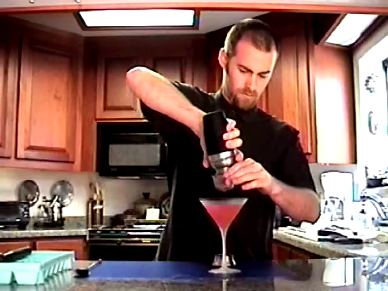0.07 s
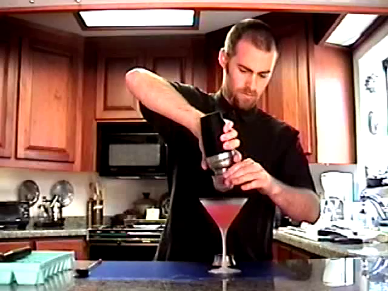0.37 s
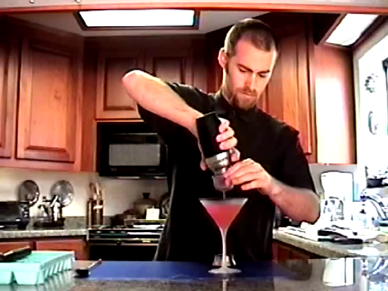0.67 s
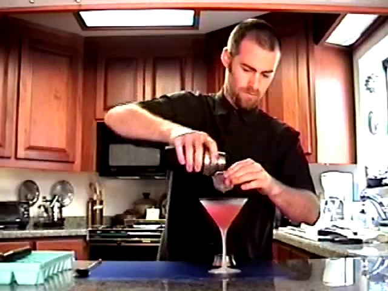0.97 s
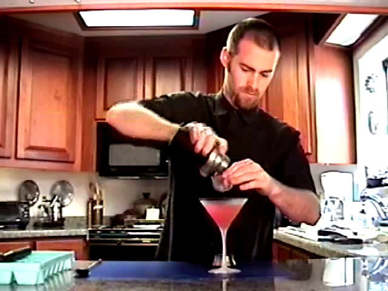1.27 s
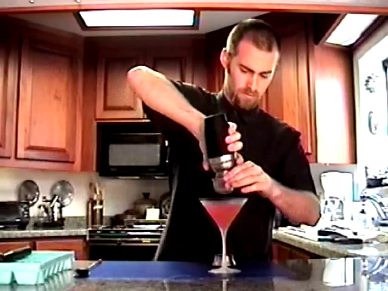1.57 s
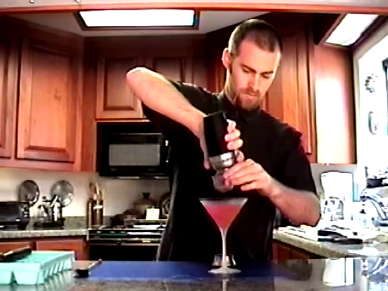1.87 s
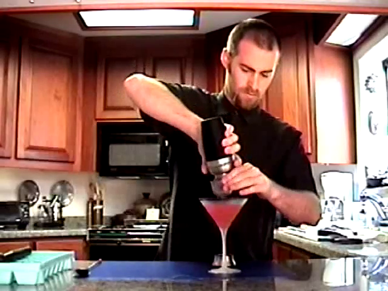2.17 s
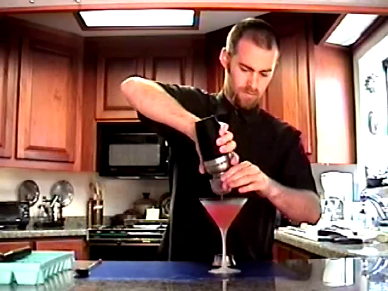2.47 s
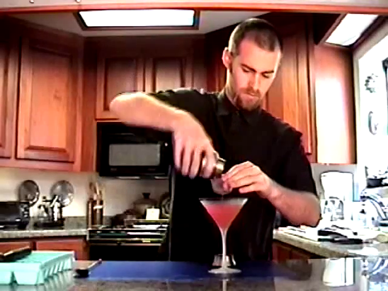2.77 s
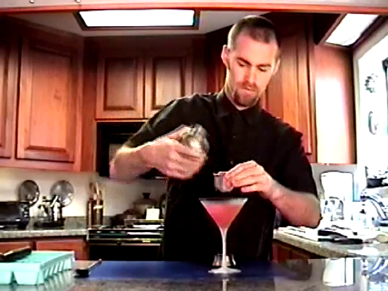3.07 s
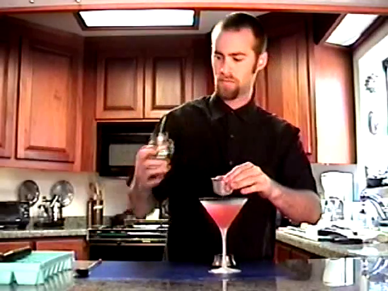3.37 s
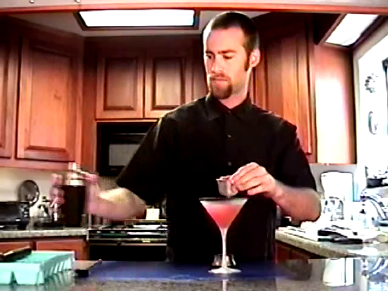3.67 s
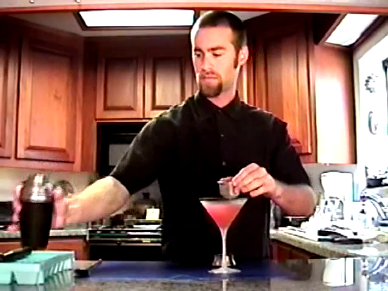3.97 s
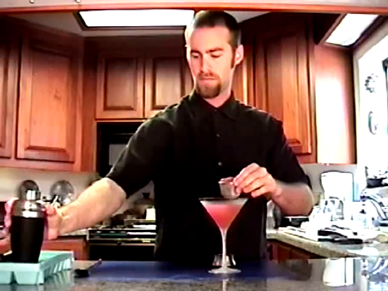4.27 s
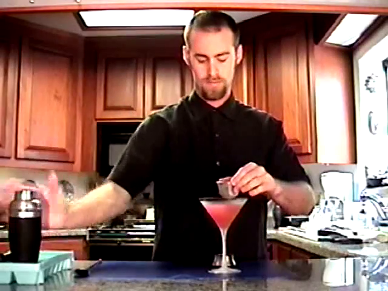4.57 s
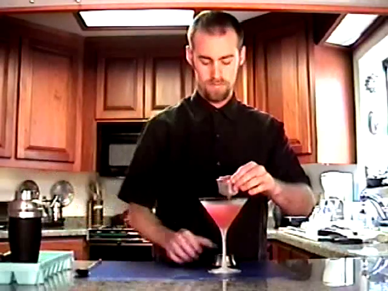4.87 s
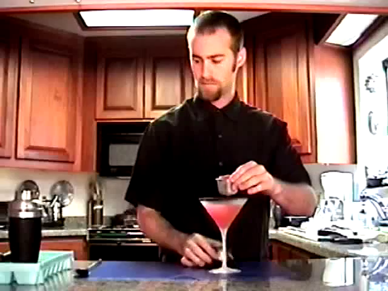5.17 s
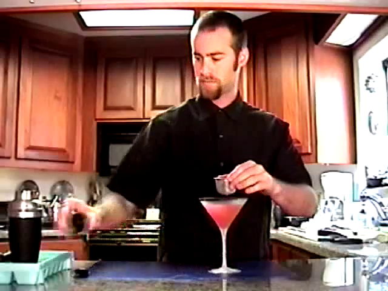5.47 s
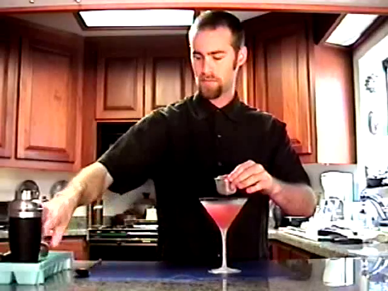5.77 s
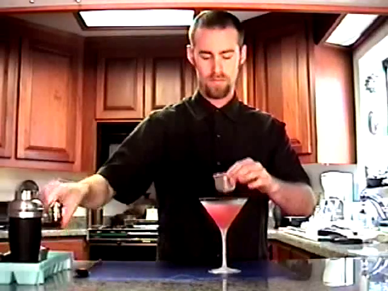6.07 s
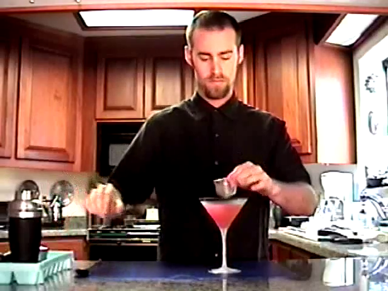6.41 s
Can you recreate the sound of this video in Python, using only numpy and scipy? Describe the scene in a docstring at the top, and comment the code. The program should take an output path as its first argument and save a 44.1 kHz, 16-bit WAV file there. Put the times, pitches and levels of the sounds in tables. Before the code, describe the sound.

In an echoing kitchen, a steel cocktail shaker is tipped twice to drain a drink. Each time, ice slides, knocks against the wall and piles into the strainer, while the cap clinks on a steel measuring cup. The shaker is then set down on the counter with a loud clack. After a few faint ticks, a utensil drops and bounces. A soft rumble and hiss continue underneath.

```python
"""A soft rumble and hiss fill an echoing kitchen. A steel cocktail shaker is tipped twice to get the
last of a drink out: ice slides, knocks on the wall and piles into the strainer, the cap clinks on a
steel jigger (a measuring cup) held under it, and the air over the sloshing drink hums. Then the shaker
is set down hard and rocks, and after a few faint ticks of handling a utensil drops beside it.
A limiter flattens the loudest blows."""
import sys
import numpy as np
from scipy import signal
from scipy.fft import rfft, irfft
from scipy.io import wavfile
from scipy.ndimage import uniform_filter1d

SR = 44100
rng = np.random.default_rng(int(sys.argv[2]) if len(sys.argv) > 2 else 0)


def store_wav(level_fs):
    """Save 16-bit WAV to argv[1]."""
    pcm = np.round(np.clip(np.atleast_2d(level_fs), -1, 1) * 32767)
    wavfile.write(sys.argv[1], SR, pcm.T.astype(np.int16))


N = 284004
TIME = np.arange(N) / SR

# Levels in the tables are relative; the functions set how loud each sound ends up.
# the room's low rumble and thin hiss: f/Hz, level/dB
RUMBLE_SPECTRUM = [(12, -76), (20, -10), (80, -20), (107, -12), (133, -17), (157, -5.5), (217, -7.5),
                   (317, -3), (341, -7), (439, -6.5), (472, -3), (498, -9), (888, -10), (1500, -20),
                   (1950, -34), (3300, -120)]
HISS_SPECTRUM = [(880, -55), (1500, -8), (1740, -6), (1970, 1), (2140, -4), (2560, -6), (3770, -13),
                 (5240, -11), (6030, -14.5), (6880, -11.5), (7560, -16.5), (9930, -13.5), (14200, -19.5)]
# how long the kitchen's echo takes to fade by 60 dB (its "t60"): f/Hz, t60/s
ECHO_FADE = [(100, 0.41), (500, 0.68), (1300, 0.61), (2600, 0.56), (5000, 0.6), (9000, 0.44), (14000, 0.44)]
# loose ice sliding: t/s, length/s, level/dB, extra for fine chips/dB, extra for heavy cubes/dB
ICE_SLIDES = [(1.035, 0.22, -37.5, -13, 1.5), (1.362, 0.074, -30.5, -4.5, -8),
              (1.55, 0.15, -30.5, -9.5, -2), (2.906, 0.095, -37, -17, 1.5), (2.999, 0.083, -28.5, -3, -6.5),
              (3.245, 0.099, -32.5, -2.5, -12), (3.462, 0.11, -27.5, -9.5, -2.5)]
# the crack of ice on steel: f/Hz, level/dB
ICE_SPECTRUM = [(290, -24.5), (500, -13), (792, -11.5), (1330, -3), (1610, -12.5), (2250, -6.5), (2940, -9),
                (4220, -5.5), (5060, -10.5), (5740, -8.5), (6970, -13.5), (8020, -12.5), (14000, -23.5)]
# ringing notes ("modes") of the shaker's wall, damped by the hand: f/Hz, width/Hz, level/dB
WALL_NOTES = [(1350, 92, -8.5), (2325, 160, -3), (2530, 130, -4), (4380, 280, -17), (5720, 110, -12)]
# single cubes hitting the wall: t/s, level/dB, extra for the clack/dB
CUBE_HITS = [(1.0385, -25.5, 9), (1.072, -22.5, 6), (1.180, -15.5, -4.5), (1.2148, -23, -15),
             (1.4266, -16, -1), (1.4724, -14, -1), (1.535, -15, -0.5), (1.5979, -14.5, 2.5),
             (1.6114, -14, -1), (1.659, -13.5, 7), (1.7476, -22, 7.5), (2.803, -43, 11),
             (2.9001, -29.5, 8.5), (2.9958, -23, -1), (3.012, -17.5, -1.5), (3.199, -18, 3.5),
             (3.460, -23, 7), (3.481, -16, 2), (3.489, -13, -2), (3.5025, -16.5, -11), (3.5459, -15, -5),
             (3.557, -12.5, -7), (3.6098, -15.5, 4.5), (3.6399, -13, 1), (3.995, -25, 2.5),
             (4.023, -34.5, 10.5), (4.07, -29.5, 10.5), (4.184, -36.5, 7)]
# the dull thud of a blow: f/Hz, level/dB
THUD_SPECTRUM = [(25, 19), (45, 18), (80, 12.5), (150, 5.5), (500, 11), (1000, 14.5), (1800, -18),
                 (4000, -49)]
# the load of ice crashing into the strainer: t/s, level/dB, extra for the thud/dB
STRAINER_CRASHES = [(1.135, -25, -13), (1.357, -24.5, -7), (1.375, -24.5, -6.5), (3.02, -24, -17),
                    (3.028, -21.5, -8), (3.044, -26.5, -28), (3.092, -23, -26)]
# the strainer plate's notes: f/Hz, width/Hz, level/dB
STRAINER_NOTES = [(3870, 160, -3), (4240, 490, 7), (5440, 150, -20)]
# cap on jigger; the spot hit decides which notes ring: t/s, level/dB, middle extra/dB, top extra/dB
CAP_HITS = [(1.2238, -26, 5.5, -4.5), (1.3051, -27, -1, 3.5), (1.332, -25, -9, -13), (1.406, -25, 1, -11),
            (1.509, -40, 8.5, 15), (3.099, -25.5, -3.5, -14), (3.2365, -32, 4.5, -3), (3.253, -32.5, 2, -4),
            (3.28, -24, -8, -2.5), (3.307, -21.5, -7.5, -9), (3.401, -30.5, -0.5, -1.5)]
# the jigger's notes: f/Hz, level/dB, t60/s
JIGGER_NOTES = [(2530, -8, 0.12), (2634, 7.5, 0.081), (2646, -12, 0.06), (4818, 0, 0.083),
                (8240, 0.5, 0.062), (10970, -9.5, 0.07), (12200, -14.5, 0.045)]
# air ringing over the last of the drink: t/s, length/s, first f/Hz, last f/Hz, level/dB
AIR_NOTES = [(1.331, 0.583, 313.4, 269.8, -51), (3.359, 0.349, 389.7, 459.7, -49.5)]
# tiny ticks of handling: t/s, level/dB
HANDLING_TICKS = [(2.693, -48), (2.952, -36), (5.074, -39.5), (5.0923, -58), (5.254, -38.5), (5.27, -46)]
# their bright tone: f/Hz, level/dB
TICK_SPECTRUM = [(1000, -32), (3000, -7), (7000, -8), (11000, -1), (14000, -10)]
# the shaker landing, then nudged as it is let go: t/s, level/dB, extra treble/dB
SHAKER_HITS = [(4.2435, -3, 5.5), (4.742, -32, -21), (4.747, -33, -10), (4.783, -37, -13),
               (4.833, -35, -12)]
# its clack on the counter: f/Hz, level/dB
SHAKER_SPECTRUM = [(59, -57), (100, -28), (182, -34), (219, -21), (254, -32), (281, -19), (568, -14.5),
                   (933, -13), (1200, -0.5), (2090, -2.5), (2650, -10), (3160, -16), (3730, -10.5),
                   (4050, -20.5), (10100, -32.5), (14000, -44)]
# notes of the shaker's base, free of the hand: f/Hz, width/Hz, level/dB
BASE_NOTES = [(210, 14, -2), (587, 12, -2), (1217, 12, 1), (1373, 12, -2), (1690, 12, -1), (2105, 14, -3),
              (2294, 14, -3)]
# the utensil dropping and bouncing: t/s, level/dB, extra treble/dB
UTENSIL_HITS = [(5.9935, -13.5, 5), (6.0738, -10, 3.5), (6.0909, -8, -3.5), (6.108, -17.5, -24),
                (6.131, -12, -7)]
# its clack on the counter: f/Hz, level/dB
UTENSIL_SPECTRUM = [(120, -66), (200, -38), (231, -29), (296, -32), (415, -15.5), (780, -17), (1120, -2),
                    (1690, 1), (2830, -12), (4030, -26.5), (5460, -25), (8510, -29), (9640, -26),
                    (14000, -46)]


def from_db(db):
    """Turn decibels into a number to multiply by."""
    return 10 ** (np.asarray(db) / 20)


def unit_power(x):
    """Scale a sound to an average power of one."""
    return x / np.sqrt(np.mean(x ** 2) + 1e-20)


def at_hz(table, hz):
    """Read between a table's rows, giving each octave equal room."""
    table = np.array(table)
    return np.interp(np.log(np.maximum(hz, 1)), np.log(table[:, 0]), table[:, 1])


def band(x, hz, kind, order=2):
    """Keep the lows, the highs or a band between."""
    return signal.sosfilt(signal.butter(order, hz, kind, fs=SR, output="sos"), x + 1e-18)


def colour(x, spectrum, size=8192):
    """Give a sound the tone of a spectrum table, using a filter of unit energy."""
    gains = from_db(at_hz(spectrum, np.fft.rfftfreq(size, 1 / SR)))
    cepstrum = irfft(np.log(gains))
    # fold it so that nothing sounds before the blow (minimum phase)
    cepstrum[1:size // 2] *= 2
    cepstrum[size // 2 + 1:] = 0
    response = irfft(np.exp(rfft(cepstrum)))
    return signal.fftconvolve(x, response / np.linalg.norm(response))[:N]


def resonances(x, notes):
    """An object rings at its own notes when it is shaken."""
    return sum(from_db(db) * signal.lfilter(*signal.iirpeak(hz, hz / width, fs=SR), x + 1e-18)
               for hz, width, db in notes)


def contacts(times, levels_db, t60, snap=0.31, size=3000):
    """Each touch is one snap and a quickly fading crunch of tiny impacts."""
    out = np.zeros(N + size)
    fade = from_db(-60 * TIME[:size] / t60)
    fade_size = np.linalg.norm(fade)
    for t, db in zip(times, levels_db):
        crunch = rng.standard_normal(size) * fade
        crunch[0] = snap * fade_size
        start = int(t * SR)
        out[start:start + size] += from_db(db) * crunch * fade_size / np.linalg.norm(crunch)
    return out[:N]


def bounces(blows, gap_s, loss_db, duller_db, rest_db, count, uneven=0.12):
    """After each blow a thing may touch again, weaker and changed in tone, until too weak to lift."""
    touches = []
    for (t, db, *tone_db), slips in zip(blows, rng.standard_normal((len(blows), count))):
        touches.append((t, db, *tone_db))
        for k in range(1, count):
            if db - k * loss_db > rest_db:
                when = t + gap_s * (k + uneven * slips[k])
                touches.append((when, db - k * loss_db, *np.subtract(tone_db, k * duller_db)))
    return np.transpose(touches)


def room_tone(rumble_db=-54, hiss_db=-63.5):
    """A steady low rumble and thin hiss."""
    rumble = from_db(rumble_db) * colour(rng.standard_normal(N), RUMBLE_SPECTRUM)
    hiss = from_db(hiss_db) * colour(rng.standard_normal(N), HISS_SPECTRUM)
    return rumble + hiss


def shaker_wall(force):
    """Ice on steel: a broad crack plus the short ring of the wall."""
    crack = colour(force, ICE_SPECTRUM)
    return crack + resonances(crack, WALL_NOTES)


def ice_grains(hits_per_s=700, spread_db=3.5, tinkle_db=-1, width_hz=190, pieces=24):
    """Random hits of uneven size; each cracks and rings briefly at the pitch of its own piece of ice."""
    sizes = from_db(spread_db * np.minimum(rng.exponential(1, N), 3))
    signs = rng.choice([-1, 1], N)
    clicks = sizes * signs * (rng.random(N) < hits_per_s / SR)
    pitches = np.geomspace(2000, 13000, pieces)
    piece = rng.integers(0, pieces, N)
    tinkle = sum(resonances(clicks * (piece == k), [(hz, width_hz * np.sqrt(hz / pitches[0]), 0)])
                 for k, hz in enumerate(pitches))
    return unit_power(shaker_wall(unit_power(clicks) + from_db(tinkle_db) * unit_power(tinkle)))


def ice_slide(slide_db=-6, chips_db=8, rise_db_per_s=400, settle_db_per_s=102, linger_db_per_s=30):
    """Each slide swells, holds and settles; chips make the highs, heavy cubes are the last to rest."""
    grains = ice_grains()
    low = band(grains, 1800, "low", order=3)
    middle = band(grains, [2400, 7500], "band", order=3)
    high = band(grains, 6430, "high", order=3)
    power = np.zeros((3, N))
    for t, length, db, fine_db, heavy_db in ICE_SLIDES:
        before, after = np.maximum(t - TIME, 0), np.maximum(TIME - t - length, 0)
        level = db + slide_db - rise_db_per_s * before - settle_db_per_s * after
        cubes = level + heavy_db + linger_db_per_s * after
        chips = level + fine_db + chips_db
        power += from_db(np.maximum([cubes, level, chips], -150)) ** 2
    return np.sum(np.sqrt(power) * [low, middle, high], axis=0)


def ice_jolts(t, db, crack_db, clack_db, thud_db):
    """Ice meets steel: a bright crack, a clack of the whole cube and a thud through the shaker."""
    crack = band(contacts(t, db + crack_db, t60=0.03, snap=0.067), 3680, "high", order=3)
    clack = band(contacts(t, db + clack_db, t60=0.02, snap=0.47), [1500, 2700], "band")
    thud = colour(contacts(t, db + thud_db, t60=0.013, snap=0.44), THUD_SPECTRUM)
    return shaker_wall(crack + clack) + thud


def ice_knocks():
    """Whole cubes land on the wall, first with a corner and then with a face."""
    t, db, extra_db = bounces(CUBE_HITS, gap_s=0.0042, loss_db=3.5, duller_db=1.5, rest_db=-29,
                              count=2, uneven=0.15)
    return ice_jolts(t, db, crack_db=-10, clack_db=extra_db - 8, thud_db=-27)


def strainer(plate_db=1):
    """The ice piles into the plate full of holes with a thud and a short bright ring."""
    t, db, thud_db = np.transpose(STRAINER_CRASHES)
    plate = resonances(contacts(t, db + plate_db, t60=0.12, snap=0.14), STRAINER_NOTES)
    return plate + ice_jolts(t, db, crack_db=-1, clack_db=-3, thud_db=thud_db)


def ring(taps, hz, t60):
    """Each tap starts one pure note that fades away."""
    decay = from_db(-60 / (t60 * SR))
    step = 2 * np.pi * hz / SR
    return signal.lfilter([0, np.sin(step)], [1, -2 * decay * np.cos(step), decay * decay], taps + 1e-18)


def jigger_clinks(ring_db=-1, uneven_db=0.5):
    """Steel on steel: the cap chatters on the jigger and rings it, and each blow jolts the ice inside."""
    t, db, middle_db, top_db = bounces(CAP_HITS, gap_s=0.022, loss_db=9.5, duller_db=-3,
                                       rest_db=-41.5, count=3)
    jigger = np.zeros(N)
    for hz, note_db, t60 in JIGGER_NOTES:
        spot_db = top_db if hz > 7000 else middle_db if hz > 4000 else 0
        taps = np.zeros(N)
        taps[(t * SR).astype(int)] = from_db(db + spot_db - uneven_db * rng.standard_normal(len(t)))
        jigger += from_db(note_db + ring_db) * ring(taps, hz, t60)
    t, db, _, top_db = np.transpose(CAP_HITS)
    return jigger + ice_jolts(t, db + top_db / 2, crack_db=4.5, clack_db=3, thud_db=-11)


def slosh(waver_hz=24):
    """The hollow note of the air in the shaker swells, glides and fades as liquid and ice shift."""
    out = np.zeros(N)
    for t, length, first_hz, last_hz, db in AIR_NOTES:
        progress = np.clip((TIME - t) / length, 0, 1)
        stir = [unit_power(band(noise, waver_hz, "low")) for noise in rng.standard_normal((2, N))]
        phase = 2 * np.pi * np.cumsum(first_hz + (last_hz - first_hz) * progress) / SR
        note = (stir[0] * np.cos(phase) + stir[1] * np.sin(phase)) / np.sqrt(2)
        out += from_db(db) * np.sin(np.pi * progress) * note
    return out


def handling_ticks(level_db=-5):
    """Light touches make faint bright ticks."""
    t, db = np.transpose(HANDLING_TICKS)
    return colour(contacts(t, db + level_db, t60=0.0096, snap=0.7), TICK_SPECTRUM)


def counter_clacks(touches, spectrum, level_db, crunch_t60):
    """A hard thing hits the counter; every touch thumps, and an edge adds treble."""
    t, db, treble_db = touches
    crunch = band(contacts(t, db, crunch_t60, snap=0.7), [800, 3300], "band", order=3)
    edge = band(contacts(t, db + treble_db, t60=0.018, snap=0.3), 3300, "high", order=3)
    thump = band(contacts(t, db, t60=0.03, snap=0.7), 800, "low", order=3)
    return from_db(level_db) * colour(crunch + edge + thump, spectrum)


def counter_thud(t, db):
    """The first touch of a landing jolts the counter into a deep thud."""
    return band(colour(contacts([t], [db], t60=0.03), THUD_SPECTRUM), 210, "low")


def shaker_down():
    """The shaker lands and rocks on its base, which rings."""
    rocking = bounces(SHAKER_HITS, gap_s=0.0098, loss_db=0.51, duller_db=0.95, rest_db=-12, count=9)
    clacks = counter_clacks(rocking, SHAKER_SPECTRUM, level_db=-7, crunch_t60=0.023)
    return clacks + resonances(clacks, BASE_NOTES) + counter_thud(SHAKER_HITS[0][0], db=-29)


def utensil_down():
    """The utensil bounces, landing on one end and then the other."""
    both_ends = bounces(UTENSIL_HITS, gap_s=0.0036, loss_db=0.5, duller_db=17, rest_db=-30, count=2)
    clacks = counter_clacks(both_ends, UTENSIL_SPECTRUM, level_db=-7.5, crunch_t60=0.022)
    return clacks + counter_thud(UTENSIL_HITS[0][0], db=-38)


def kitchen(x, echo_db=-2, first_s=0.0011, build_s=0.006):
    """Dense echoes from cupboards and counters build up and die away, band by band."""
    t = TIME[:SR]
    noise, hz = rfft(rng.standard_normal(SR)), np.fft.rfftfreq(SR, 1 / SR)
    edges = np.geomspace(40, SR / 2, 15)
    tail = np.zeros(SR)
    for low, high in zip(edges, edges[1:]):
        t60 = at_hz(ECHO_FADE, np.sqrt(low * high))
        tail += irfft(noise * (hz >= low) * (hz < high), SR) * from_db(-60 * t / t60)
    tail *= np.clip((t - first_s) / build_s, 0, 1)
    return x + from_db(echo_db) * signal.fftconvolve(x, tail / np.linalg.norm(tail))[:N]


def scene():
    """The shaker in the hand and the blows on the counter echo in the same kitchen."""
    in_hand = ice_knocks() + ice_slide() + strainer() + slosh() + jigger_clinks() + handling_ticks()
    return (kitchen(in_hand) + kitchen(shaker_down() + utensil_down()) + room_tone())[None]


def limiter(x, ceiling_db=-20.5, release_db_per_s=700, peak=0.17, window=64):
    """The volume drops at once on a loud moment and climbs back quickly."""
    power = np.maximum(uniform_filter1d(x ** 2, window), 1e-12)
    over_db = np.maximum(10 * np.log10(power) - ceiling_db, 0)
    climb = release_db_per_s * TIME
    gain_db = climb - np.maximum.accumulate(over_db + climb, axis=-1)
    held = x * from_db(uniform_filter1d(gain_db, window // 2))
    return held / (1 + (held / peak) ** 4) ** (1 / 4)  # round off spikes that slip through


def record(dry):
    """Loud blows are held down and the highest treble is cut."""
    cutoff_hz = 14250
    return signal.sosfilt(signal.ellip(12, 0.1, 80, cutoff_hz, fs=SR, output="sos"), limiter(dry))


dry = scene()
out = record(dry)
store_wav(out)
```